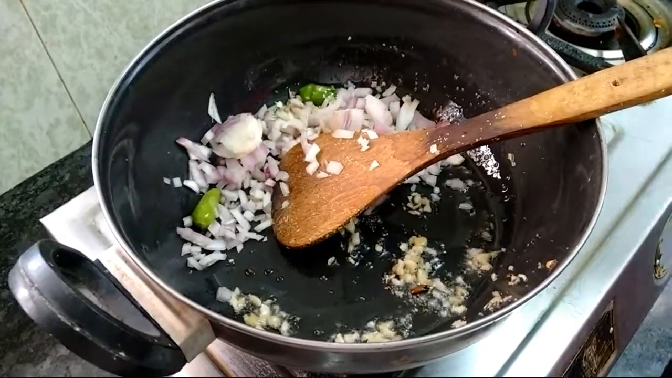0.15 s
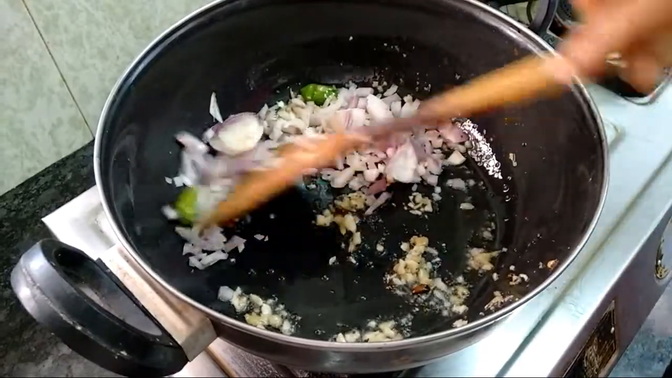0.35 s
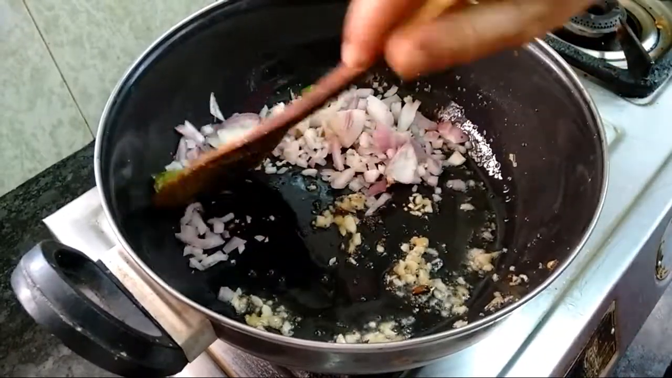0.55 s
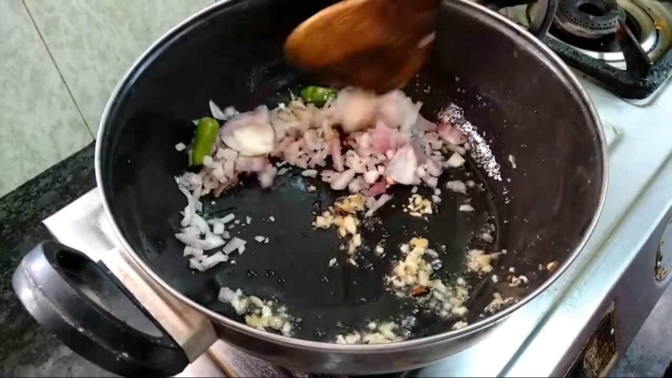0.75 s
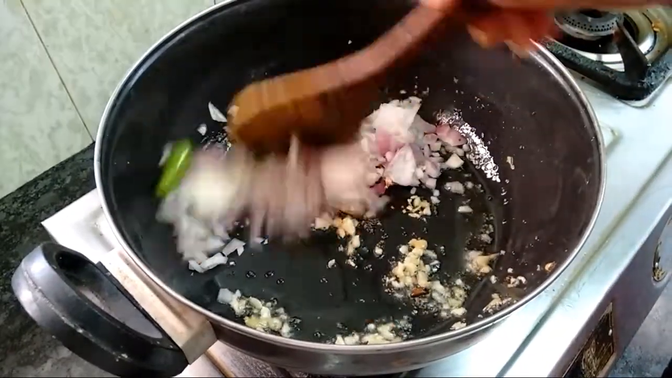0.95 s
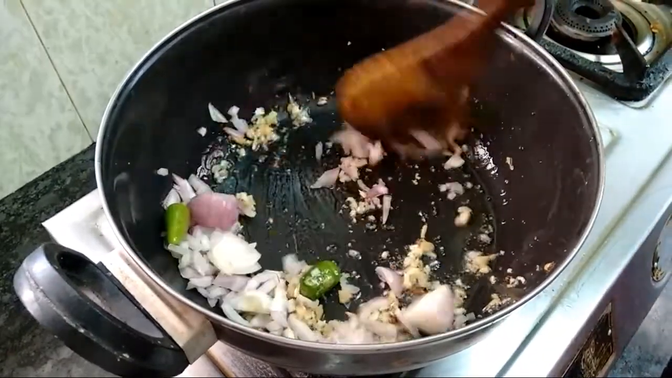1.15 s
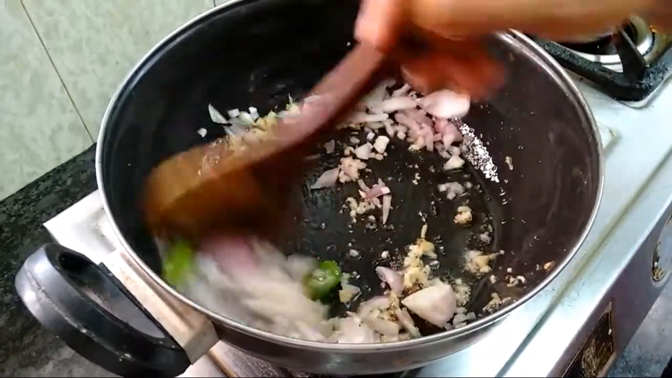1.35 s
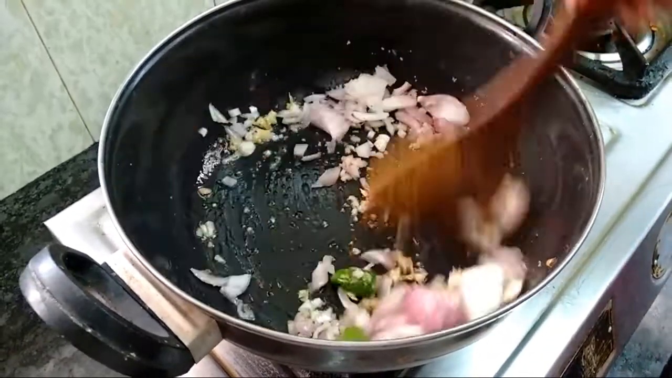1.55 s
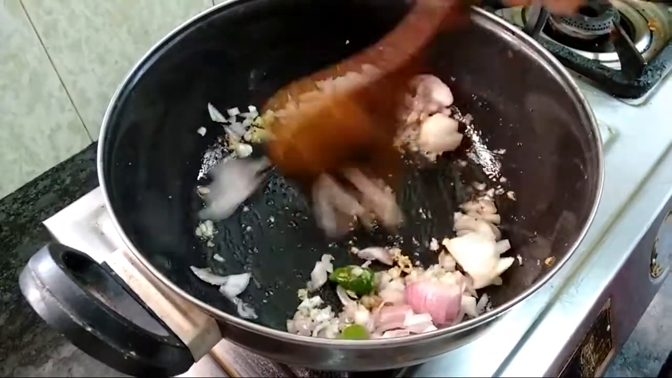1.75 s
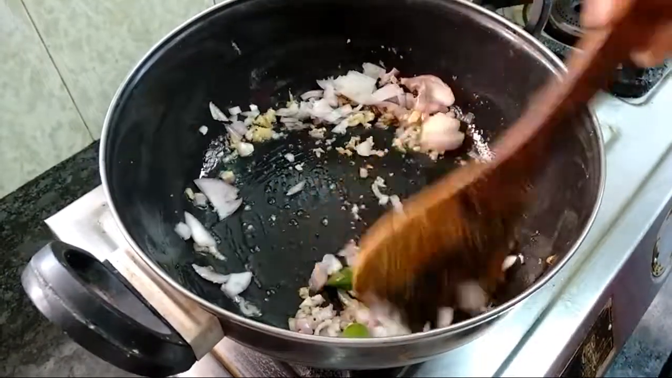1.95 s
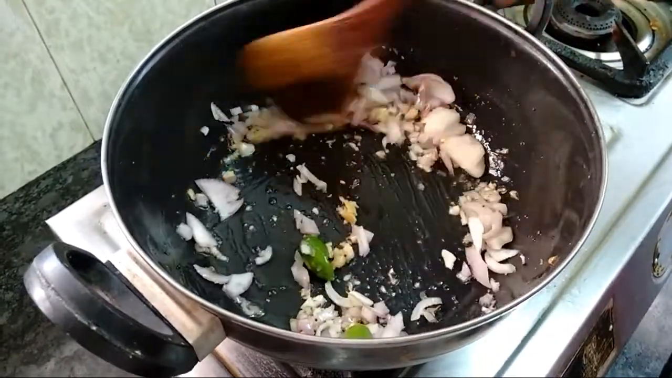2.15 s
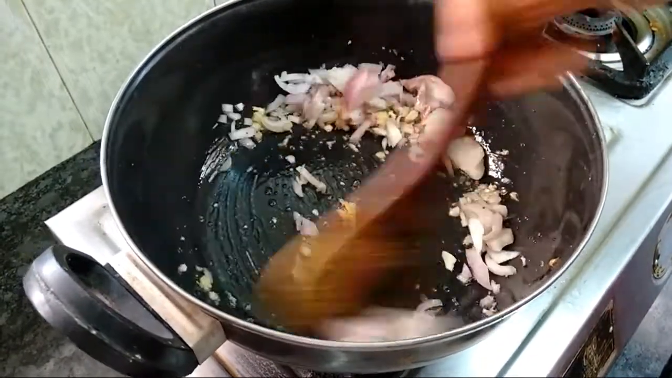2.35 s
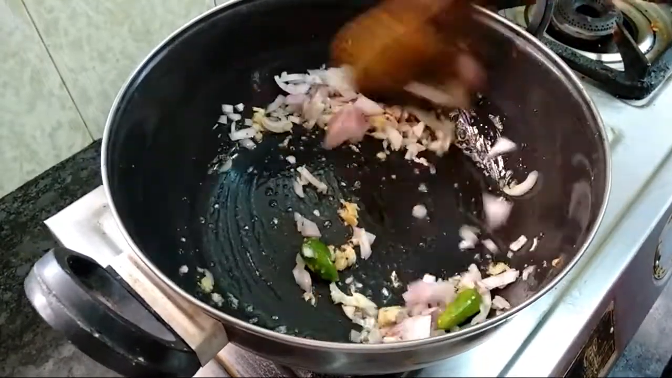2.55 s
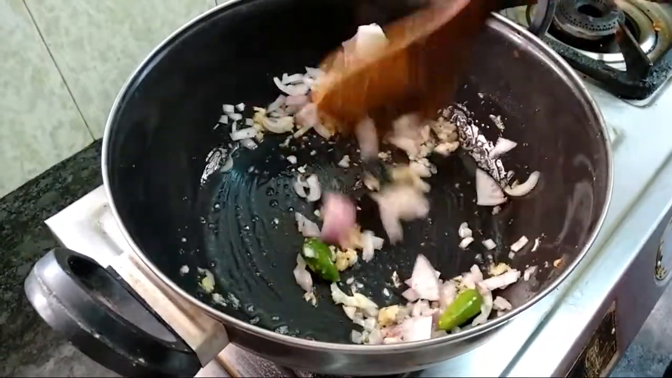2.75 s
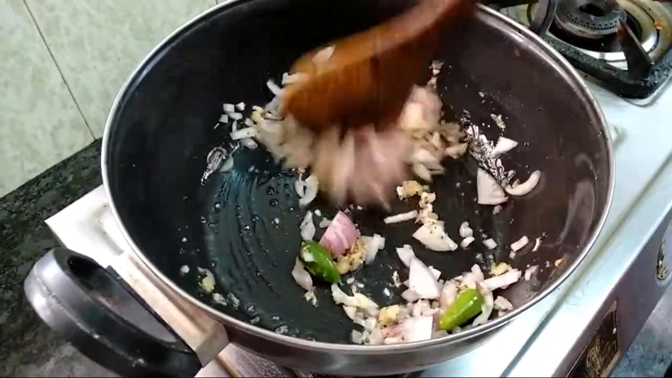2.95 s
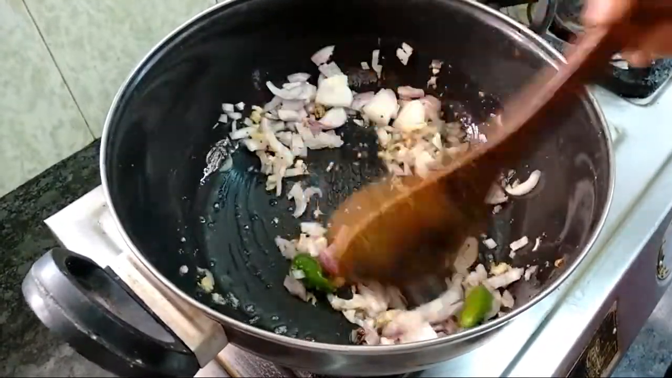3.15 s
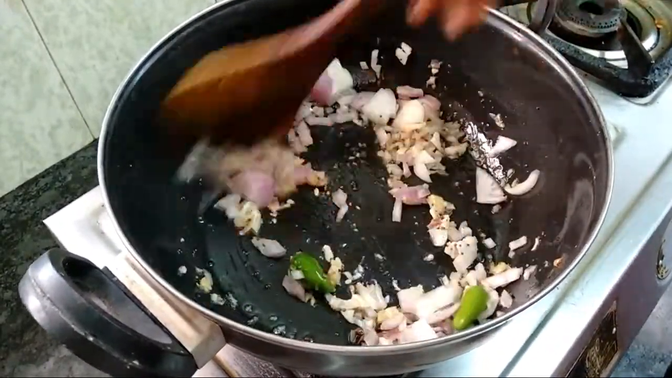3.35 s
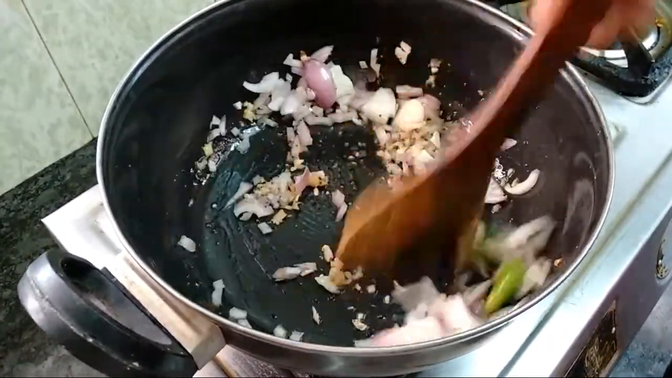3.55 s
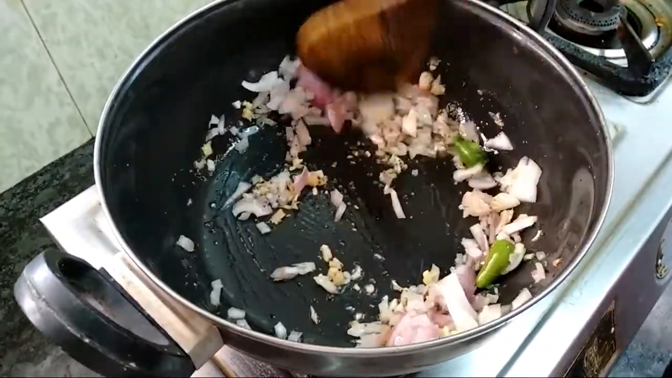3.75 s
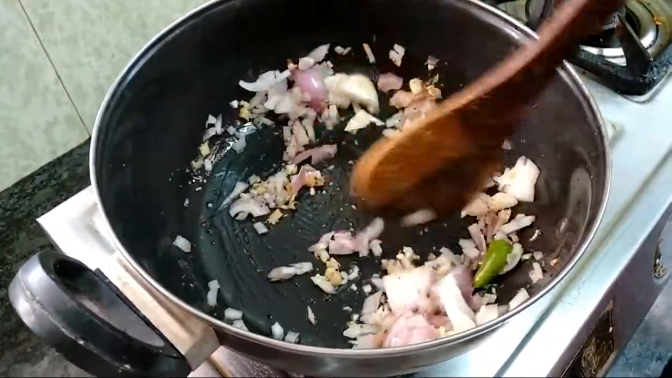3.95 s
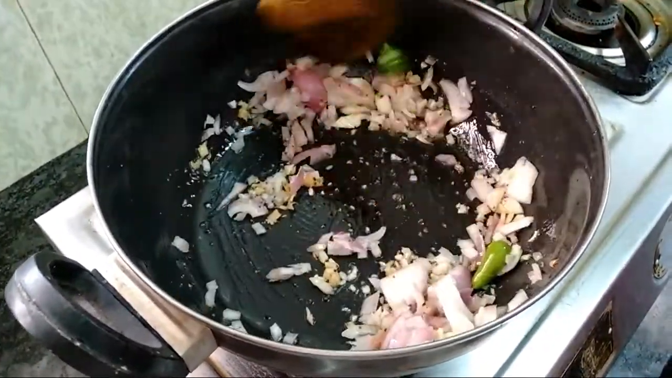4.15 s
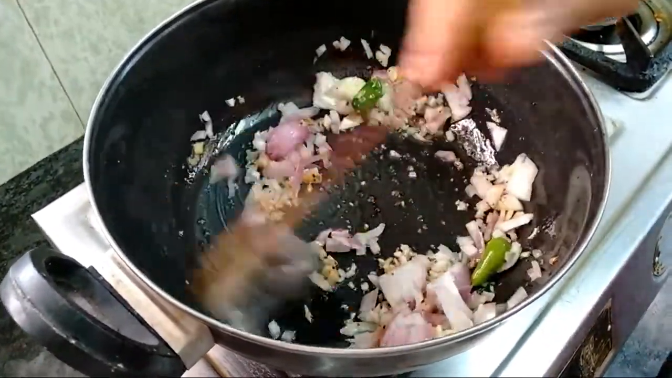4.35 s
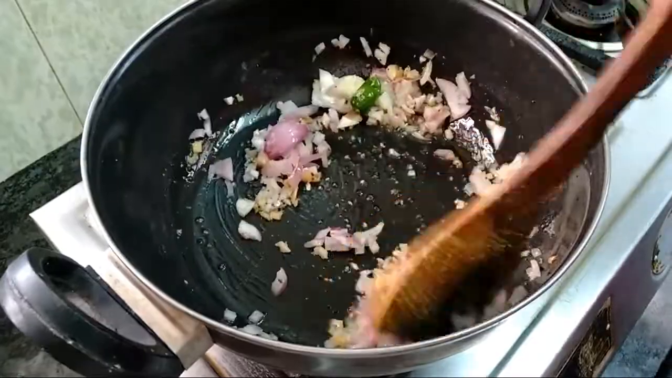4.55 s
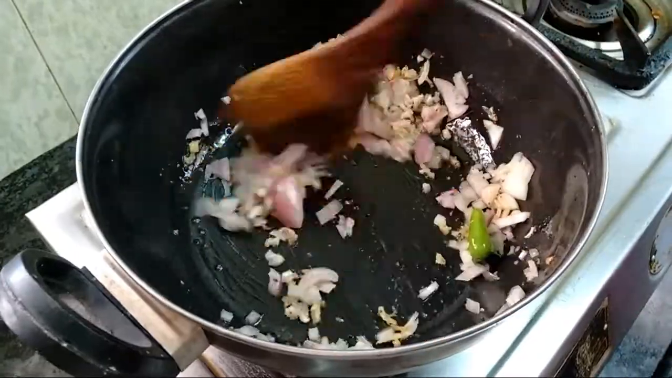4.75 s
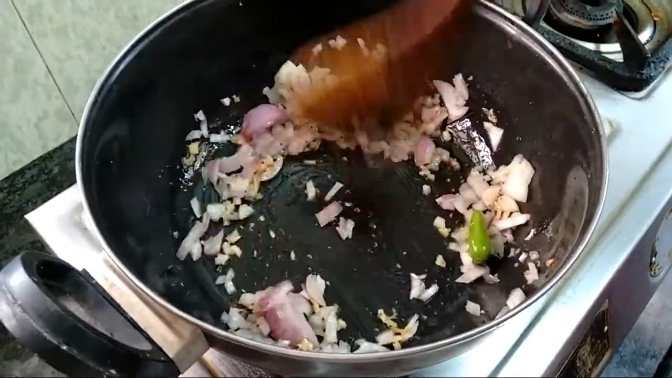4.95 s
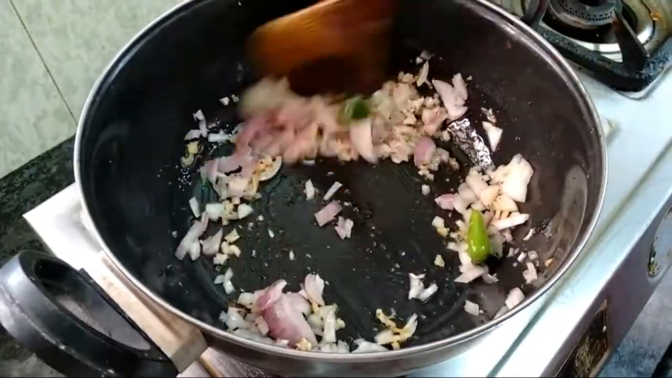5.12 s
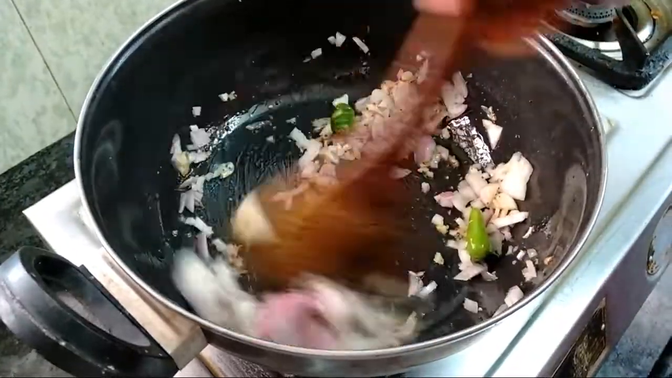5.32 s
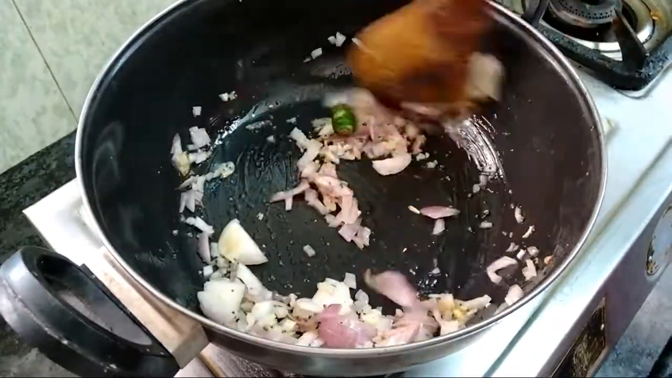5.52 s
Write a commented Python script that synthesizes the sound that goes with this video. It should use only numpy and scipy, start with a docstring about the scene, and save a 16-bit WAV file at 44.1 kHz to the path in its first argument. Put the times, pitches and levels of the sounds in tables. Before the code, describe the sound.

Soft frying alone at first, a tiny handle squeak, then busy irregular stirring until the end. Wood clacks against a metal pan with short, dull rings, rubbing over the oiled bottom and sometimes chattering. Bright sizzle swells after the strokes, dotted with crackles and snappy ticks. The microphone is close, the small room fairly dry, with a faint low stove rush.

```python
"""In a small kitchen, a wooden spatula stirs chopped onions in a pan of hot oil on a gas stove.
Steam bubbles are random clicks and noise, flaring where wet onion meets hot metal; larger ones pop or spit.
Friction is noise or stick-slip shaped by spectra and by the pan's modes; each knock is a clack with a modal ring.
Two ports close by hear direct and scattered sound, dense reverberation, and filtered noise for the low rush
of the burner with a fan hum near 100 Hz.
"""
import sys
import numpy as np
from scipy import signal
from scipy.fft import rfft, irfft
from scipy.io import wavfile
from scipy.ndimage import uniform_filter1d

SR = 44100
rng = np.random.default_rng(int(sys.argv[2]) if len(sys.argv) > 2 else 0)


def materialize(psi):
    """Save the field psi as 16-bit PCM at rate SR to the path in sys.argv[1].

    A 1-D psi becomes a single channel; in a 2-D psi each row is a channel.
    """
    bounded = np.clip(np.atleast_2d(psi).T, -1, 1)
    quanta = np.round(bounded * 32767).astype(np.int16)
    wavfile.write(sys.argv[1], SR, quanta)


N = 246078
TIME, BINS = np.arange(N) / SR, np.fft.rfftfreq(N, 1 / SR)  # [s], [Hz]

# Spectrum of the frying bubbles: (frequency [Hz], relative spectral density [dB])
SIZZLE_SPECTRUM = [(200, -35), (500, -6.5), (960, -14.5), (1200, -3.5), (1360, -14.5), (1580, -9),
                   (1900, -8), (2200, -9.5), (2420, -17), (2650, 0), (2900, -3), (3650, -3.5), (4300, -3),
                   (4900, -6), (6200, -1.46), (7400, 0), (8450, 1.5), (9500, -3), (11500, -10)]
# Wet onion pushed onto hot metal:
# (time [s], length [s], relative level [dB], body setting around 3.5 kHz [dB])
ONION_FLARES = [(0.332, 0.072, -38.5, -7.5), (0.603, 0.4, -44, -2), (0.963, 0.18, -26.5, -12),
                (1.382, 0.042, -32.5, -9), (1.604, 0.17, -33.5, -10.5), (1.773, 0.28, -33, -10.5),
                (2.034, 0.13, -26, -10.5), (2.287, 0.095, -37, -9.5), (2.465, 0.2, -40.5, -8),
                (2.725, 0.29, -32, -14), (2.97, 0.2, -29, -13.5), (3.212, 0.15, -27, -16.5),
                (3.418, 0.18, -32, -14), (3.641, 0.077, -30.5, -12), (3.86, 0.093, -30, -11.5),
                (4.046, 0.032, -31, -20), (4.272, 0.28, -30, -14.5), (4.659, 0.14, -28.5, -12.5),
                (5.093, 0.023, -33, -6.5), (5.176, 0.17, -29.5, -16), (5.42, 0.11, -33.5, -21)]
# Spectrum of the popping bubbles: (frequency [Hz], relative spectral weight [dB])
CRACKLE_SPECTRUM = [(500, -22), (2300, -21), (3600, -3), (5000, -5), (8400, 5), (15000, -3)]
# Spectrum of the burner's low rush with a 100 Hz fan hum: (frequency [Hz], relative spectral density [dB])
BURNER_AND_FAN_SPECTRUM = [(20, 1), (50, 0), (75, 4), (101, 17), (140, 4), (200, 0.5), (330, 15.5),
                           (600, -9), (1200, 8), (3000, -16)]
# The handle squeaks as it is taken up:
# (time [s], length [s], relative level [dB], pitch [Hz], glide [Hz/s])
HANDLE_SQUEAKS = [(0.232, 0.032, -43, 1615, 1000), (0.233, 0.026, -38, 2070, -2500),
                  (0.25, 0.042, -44, 2280, -3000), (0.292, 0.041, -45, 1670, 200),
                  (0.28, 0.03, -47, 2100, -500)]
# The blade is pushed over the oiled bottom: (time [s], length [s], relative level [dB])
BLADE_STROKES = [(0.34, 0.29, -47), (0.91, 0.26, -36.5), (1.128, 0.026, -40), (1.346, 0.16, -34.5),
                 (1.597, 0.031, -37), (1.765, 0.039, -40.5), (2, 0.31, -42.5), (2.354, 0.15, -41),
                 (2.77, 0.3, -42), (3.065, 0.078, -37), (3.23, 0.08, -40), (3.482, 0.13, -32.5),
                 (3.91, 0.14, -42.5), (4.11, 0.13, -40.5), (4.385, 0.13, -36), (4.728, 0.02, -38.5),
                 (5.13, 0.12, -38.5), (5.432, 0.034, -40.5)]
# Spectrum of the sliding blade: (frequency [Hz], relative spectral weight [dB])
SLIDE_SPECTRUM = [(60, -72), (150, -6.5), (255, 0), (310, 5), (420, 3), (600, 0.5), (900, -2.5),
                  (1500, -8.5), (2500, -36), (5000, -15)]
# Vibration modes of the pan: (nominal frequency [Hz], relative level [dB], decay time t60 [s])
PAN_MODES = [(250.4, -29.5, 0.49), (340, -25, 0.32), (373.3, -13, 0.21), (446.6, 0.5, 0.094),
             (474, -25, 0.15), (603, -22.5, 0.26), (662, -12, 0.2), (717, -14.5, 0.12), (782, -16.5, 0.08),
             (814, -26, 0.3), (864, -14, 0.22), (1090, -13.5, 0.08), (1270, -23, 0.13), (1294, -23, 0.051),
             (1485, -24.5, 0.11), (1706, -29, 0.15), (2920, -34, 0.08), (3420, -23, 0.05),
             (3670, -25, 0.04)]
# Share of a mode that lives in the wall of the pan: (frequency [Hz], share [0..1])
WALL_SHARE = [(480, 0.081), (620, 1), (800, 0.76), (1100, 0)]
# Single spits of oil and snaps of onion:
# (time [s], relative peak level [dB], body setting around 3.5 kHz [dB])
OIL_SPITS = [(0.353, -12, -29), (0.828, -6.5, -18), (1.182, -6.5, -19), (2.774, -9, -25), (2.851, -9, -22),
             (3.0067, -6, -16), (3.239, -8, -5), (3.378, -11, -22), (3.474, -10, -33), (3.619, -14, -26),
             (3.816, -4, -25), (4.025, -8, -41), (4.069, -9, -14), (4.229, -9.5, -15), (4.2844, -10, -21),
             (4.5862, -7.5, -28), (4.683, -1.5, -8), (4.797, -5.5, -31), (5.263, -4, -21)]
# The spatula strikes the pan:
# (time [s], relative peak level [dB], hardness setting [dB], extra ring of the wall [dB])
PAN_KNOCKS = [(0.36, -41, -26, -12), (0.405, -39.5, -23, -2), (0.709, -24, -9, -2), (0.878, -15, 3, -9),
              (1.043, -26, -1, 3), (1.078, -34, -19, -1), (1.102, -24, -15, -4), (1.272, -32, -21, -2),
              (1.3645, -15.5, 3.5, -2), (1.403, -22, 2, 3), (1.578, -12.5, 7.5, 5.5), (1.763, -33, -26, -4),
              (2.014, -17, 8, -10), (2.073, -28.5, -17, -2), (2.7464, -15.5, -11.5, 0.5),
              (3.0222, -4.5, -9, -4), (3.0415, -19, -3, 0), (3.406, -25, 4, -10), (3.505, -28.5, -4, -2),
              (3.612, -20.5, -8, -1), (3.874, -13, -7, 2.5), (4.0718, -13.5, -14, -4),
              (4.0865, -30, -12, 8), (4.115, -29.5, -15, 8), (4.326, -20, -0.5, 3), (4.383, -27, 4, 8),
              (4.682, -31, 20, 0), (4.709, -20.5, -11, -2), (4.918, -40.5, -18, 1), (5.1167, -16.5, 0, 2),
              (5.182, -26, -10, -0.5), (5.334, -33, -11, 7), (5.467, -31, 11, 6)]
# Spectrum of the wooden blade's clack: (frequency [Hz], relative spectral weight [dB])
WOOD_SPECTRUM = [(60, -39), (150, -2), (300, 7.5), (520, 15.5), (1200, 8.5), (1800, 2.5), (2400, 7.5),
                 (3500, -5.5), (5000, -32.5), (9000, -13)]
# Spectrum of the juddering blade: (frequency [Hz], relative spectral density [dB])
JUDDER_SPECTRUM = [(50, -56), (100, -11), (190, -14), (245, 1), (290, -7), (375, 1), (445, -2), (560, -8),
                   (690, -4), (900, -12.5), (1080, -10), (1500, -16.5), (2100, -24), (4000, -37)]
# The blade catches and chatters in step with a resonance of the pan:
# (time [s], length [s], relative level [dB], mean slip rate [1/s])
BLADE_CHATTERS = [(0.635, 0.012, -34, 340), (0.704, 0.059, -30, 368), (0.71, 0.058, -36, 250),
                  (1.1, 0.026, -41, 426), (3.228, 0.064, -44, 250), (3.278, 0.077, -47.5, 410),
                  (3.532, 0.061, -36, 350), (4.734, 0.03, -33.5, 490), (4.805, 0.039, -42, 450),
                  (5.185, 0.036, -41, 750)]
# The edge of the blade meets bare metal:
# (time [s], relative level [dB], centre frequency [Hz], width [octaves], decay time t60 [s])
METAL_PINGS = [(0.881, -34.5, 3100, 0.1, 0.15), (1.579, -48, 3000, 0.29, 0.1),
               (3.022, -30, 3340, 0.28, 0.11)]
# The stove thuds under a push:
# (time [s], relative level [dB], centre frequency [Hz], width [octaves], decay time t60 [s])
STOVE_THUDS = [(4.327, -44, 125, 0.77, 0.39), (5.12, -39.5, 255, 0.25, 0.27),
               (5.241, -47.5, 118, 0.45, 0.29)]
# Reverberation of the kitchen: (frequency [Hz], decay time t60 [s])
KITCHEN_DECAY = [(150, 0.23), (500, 0.36), (1400, 0.13), (8000, 0.23)]
# Share of the power that reaches both ports alike: (frequency [Hz], share [0..1])
DIRECT_SHARE = [(100, 0.97), (400, 0.89), (1150, 1), (1900, 1), (2650, 1), (3050, 0.91), (3700, 1),
                (4800, 0.38), (6200, 0.69), (8500, 0.65), (10500, 0.042), (15000, 0.98)]
# Colour difference of the ports: (frequency [Hz], left minus right [dB])
PORT_BALANCE = [(100, 7), (190, -2.5), (300, 1), (440, 6.5), (620, 1.5), (1000, 1.2), (1550, -2), (2200, 0),
                (3000, -1), (3700, -0.5), (6500, 0.5), (8300, -0.5), (9800, -7), (15000, -3.5)]


def gain_of(db):
    """Level relation: decibels become an amplitude ratio."""
    return 10 ** (np.asarray(db) / 20)


def evened(x):
    """Normalisation: a signal divided by its root mean square has rms 1."""
    return x / np.sqrt(np.mean(x ** 2) + 1e-20)


def read(points, hz):
    """Interpolation: a spectral table is read linearly on a log-frequency axis."""
    f, value = np.transpose(points)
    return np.interp(np.log(hz + 1), np.log(f + 1), value)


def add(mix, s, sound):
    """Superposition: a sound is added to the mix from s seconds on."""
    part = mix[max(round(s * SR), 0):][:len(sound)]
    part += sound[:len(part)]


def colour(x, points, size=4096):
    """Minimum-phase filtering: the log gain and its Hilbert transform give a causal response."""
    log_gain = np.log(gain_of(read(points, abs(np.fft.fftfreq(size, 1 / SR)))))
    response = np.exp(np.conj(signal.hilbert(log_gain)))
    taps = np.fft.ifft(response).real[:size // 2]
    return signal.oaconvolve(x, taps)[:len(x)]


def clicks(per_s, spread_db, cap):
    """Shot noise: impulses of random sign at random times, their dB offsets capped exponential draws."""
    size = gain_of(spread_db * np.minimum(rng.exponential(1, N), cap))
    return evened(size * rng.choice([-1, 1], N) * (rng.random(N) < per_s / SR))


def wander(rate_hz):
    """Band-limited noise: low-pass filtering leaves a random drift of rms 1."""
    lowpass = signal.butter(2, rate_hz, fs=SR, output="sos")
    return evened(signal.sosfilt(lowpass, rng.standard_normal(N)))


def gesture(start, length, rise_s, t60):
    """Exponential relaxation: a force builds up, holds for the length, then decays."""
    t = np.maximum(TIME - start, 0)
    return (1 - np.exp(-t / rise_s)) * np.exp(-np.log(1000) * np.maximum(t - length, 0) / t60)


def frying(resting_db=-40, stirred_db=-35, stirred_by_s=0.5, simmer_body_db=-12):
    """Power addition: flares from boiling water add to a simmer that grows as stirring spreads the onions."""
    power = gain_of(np.interp(TIME, [0, stirred_by_s], [resting_db, stirred_db])) ** 2
    body = power * gain_of(simmer_body_db) ** 2
    for s, length, db, body_db in ONION_FLARES:
        # steam builds up quickly, then the water boils off
        flare = (gain_of(db) * gesture(s, length, rise_s=0.016, t60=0.46)) ** 2
        power = power + flare
        body = body + flare * gain_of(body_db) ** 2
    return 10 * np.log10(power), 10 * np.log10(body / power)


def sizzle(bubbles_per_s=3000, fizz_db=-7, flurry_db=0.5, usual_body_db=-10.5, level_db=-0.27):
    """Shot noise of bursting bubbles over a fine fizz: flares move its level and its spectral balance."""
    frying_db, body_db = frying()
    bursts = clicks(bubbles_per_s, spread_db=-1.0, cap=6.8) + gain_of(fizz_db) * rng.standard_normal(N)
    sound = evened(colour(bursts * gain_of(flurry_db * wander(rate_hz=18)), SIZZLE_SPECTRUM))
    body_band = [(900, 0.94), (2500, 1.0), (4200, 1), (6500, 0.23)]  # (frequency [Hz], gain)
    body = irfft(rfft(sound) * read(body_band, BINS), N)
    balanced = sound + (gain_of(body_db - usual_body_db) - 1) * body
    return gain_of(frying_db + level_db) * balanced


def crackle(count=900, spread_db=3.0, cap=3.9, level_db=-43):
    """Bubble resonance: each larger bubble is a damped sine rising as it closes, louder during flares."""
    lowest_hz, highest_hz = 3000, 12200
    cycles, glide = 1.6, 0.087  # cycles until a pop has faded to 1/e, phase advance that raises the pitch
    pops = np.zeros(N)
    for when, pitch, chance in rng.random((count, 3)):
        hz = lowest_hz * (highest_hz / lowest_hz) ** pitch
        age = np.arange(256) / SR * hz / cycles
        turns = cycles * age * (1 + glide * (1 - np.exp(-age)))
        pop = np.exp(-age) * np.sin(2 * np.pi * turns)
        add(pops, when * N / SR, gain_of(spread_db * min(-np.log(1 - chance), cap)) * pop)
    return gain_of(level_db) * evened(colour(pops, CRACKLE_SPECTRUM) * gain_of(frying()[0]))


def burner_and_fan(level_db=-58):
    """Filtered stationary noise: one spectrum holds the burner's low rush and a fan hum near 100 Hz."""
    return gain_of(level_db) * evened(colour(rng.standard_normal(N), BURNER_AND_FAN_SPECTRUM))


def squeaking(jitter=0.018, rough=0.44):
    """Stick-slip oscillation: thin, scratchy tones glide as the grip on the handle tightens."""
    pace, out = 1 + jitter * wander(rate_hz=140), np.zeros(N)
    for s, length, db, hz, glide in HANDLE_SQUEAKS:
        pitch = hz + glide * np.clip(TIME - s, 0, length)
        tone = np.sin(2 * np.pi * np.cumsum(pitch * pace) / SR)
        out += gain_of(db) * gesture(s, length, rise_s=0.006, t60=0.081) * tone
    return out * evened(1 + rough * wander(rate_hz=200))


def pan_ring(t, hardness_db, wall_db, uneven_db=2.0, detune=0.0049, soft_hz=500, hard_hz=1200):
    """Modal superposition: hard blows wake upper modes, blows near the wall middle ones; the blade shifts them."""
    hz, db, t60 = np.transpose(PAN_MODES)[:, :, None]
    # the strongest mode keeps its nominal weight and frequency
    weight, shift = rng.standard_normal((2, len(PAN_MODES), 1)) * (db < db.max())
    hardness = hardness_db * read([(soft_hz, 0), (hard_hz, 1)], hz)
    db = db + hardness + wall_db * read(WALL_SHARE, hz) + uneven_db * weight
    modes = gain_of(db - 60 * t / t60) * np.cos(2 * np.pi * hz * (1 + detune * shift) * t)
    return modes[1::2].sum(0) - modes[::2].sum(0)  # neighbouring modes swing in opposite directions


def pushing(sag_db_per_s=29):
    """Power addition of strokes: the blade bites, weakens as it slows down, and lifts."""
    power = 0
    for s, length, db in BLADE_STROKES:
        sagging_db = db - sag_db_per_s * np.maximum(TIME - s, 0)
        power = power + (gain_of(sagging_db) * gesture(s, length, rise_s=0.015, t60=0.85)) ** 2
    return np.sqrt(power)


def sliding(slips_per_s=1300, ring_db=-9, lumps_db=1.0, level_db=-2.0):
    """Dry friction as shot noise: small slips of wood on metal, uneven where onion rolls under the blade."""
    slips = clicks(slips_per_s, spread_db=3.5, cap=4.8) * gain_of(lumps_db * wander(rate_hz=16.0))
    ring = signal.oaconvolve(slips, pan_ring(np.arange(SR // 2) / SR, 0, 0))[:N]
    rub = evened(colour(slips, SLIDE_SPECTRUM)) + gain_of(ring_db) * evened(colour(ring, SLIDE_SPECTRUM))
    return gain_of(level_db) * pushing() * evened(rub)


def spits(swell_s=0.00082, usual_body_db=-8, level_db=-11.0):
    """Impulsive radiation: a larger droplet bursts as a short noise pulse, one sharp tick."""
    out, t = np.zeros(N), np.arange(512) / SR
    burst = (t / swell_s) ** 2 * np.exp(-2 * t / swell_s)
    for s, db, body_db in OIL_SPITS:
        body = body_db - usual_body_db
        spectrum = [(1200, body - 20), (3700, body - 3), (8500, -8), (15000, -37.0)]  # (Hz, dB)
        tick = colour(rng.standard_normal(len(t)) * burst, spectrum)
        add(out, s, gain_of(db + level_db) * tick / abs(tick).max())
    return out


def rebounds(bounce_db=-21, earliest_s=0.007, latest_s=0.025, count=2):
    """Elastic rebound: after the first contact the springy blade touches again more lightly."""
    touches = np.zeros(SR // 10)
    touches[0] = 1
    touches[(SR * rng.uniform(earliest_s, latest_s, count)).astype(int)] = gain_of(bounce_db)
    return touches


def knocks(usual_hardness_db=-10, clack_db=1, rattle_db=1, rattle_t60=0.2, crispness=0.038,
           ring_hardness=0.37, radiates_hz=200, dull_hz=1900, squeeze_s=0.001582, level_db=1):
    """Impact excitation: after squeezing through onion, the blade clacks and sets the loaded pan ringing."""
    out, t = np.zeros(N), np.arange(SR // 2) / SR
    radiation = signal.butter(2, [radiates_hz, dull_hz], "bandpass", fs=SR, output="sos")
    for s, db, hardness_db, wall_db in PAN_KNOCKS:
        extra_db = hardness_db - usual_hardness_db
        rattle = rng.standard_normal(len(t)) * np.exp(-np.log(1000) * t / rattle_t60)
        # bare metal gives a cleaner tick
        rattle *= gain_of(rattle_db - crispness * extra_db) / np.linalg.norm(rattle)
        clack = colour((t == 0) + rattle, WOOD_SPECTRUM)
        ring = signal.sosfilt(radiation, pan_ring(t, ring_hardness * extra_db, wall_db))
        contact = ring + gain_of(clack_db + extra_db) * clack / abs(clack).max()
        blow = signal.oaconvolve(contact, rebounds())
        add(out, s + squeeze_s, gain_of(db + level_db) * blow / abs(blow).max())
    return out


def juddering(slips_per_s=170, jitter=0.63, grit_db=0):
    """Irregular stick-slip: the blade judders along the dry wall, with grit noise between uneven slips."""
    start_s, peak_s, end_s = 0.594, 0.73, 0.855  # pressed hardest at the peak of its sweep
    peak_db, swell_db_per_s, ease_db_per_s = -31, 46, 96
    pace = slips_per_s * np.exp(jitter * evened(uniform_filter1d(rng.standard_normal(N), size=300)))
    slips = np.diff(np.floor(np.cumsum(pace) / SR), prepend=0)
    grit = gain_of(grit_db) * rng.standard_normal(N)
    rub = evened(colour(evened(slips - slips.mean()) + grit, JUDDER_SPECTRUM))
    touching = uniform_filter1d(1. * ((TIME > start_s) & (TIME < end_s)), size=600)
    eased_db = np.maximum(swell_db_per_s * (peak_s - TIME), ease_db_per_s * (TIME - peak_s))
    return gain_of(peak_db - eased_db) * touching * rub


def chattering(jitter=0.08, rough=0.16, overtone_db=-18):
    """Mode-locked stick-slip: slips in step with the pan form a short, rough harmonic groan."""
    pace = np.cumsum(1 + jitter * wander(rate_hz=135.0)) / SR
    grip = 1 + rough * wander(rate_hz=55)
    out = np.zeros(N)
    for s, length, db, hz in BLADE_CHATTERS:
        slips = sum(gain_of(overtone_db * k) * np.sin(2 * np.pi * (k + 1) * hz * pace) for k in range(3))
        out += gain_of(db) * gesture(s, length, rise_s=0.019, t60=0.094) * evened(grip * slips)
    return out


def puffs(events, rise_s=0.0021):
    """Damped narrow-band noise: each event is a short dying puff of sound around one pitch."""
    out = np.zeros(N)
    for s, db, hz, octaves, t60 in events:
        band = np.exp(-.5 * (np.log2((BINS + 1) / hz) / octaves) ** 2)
        puff = evened(irfft(rfft(rng.standard_normal(N)) * band, N))
        fade = (1 - np.exp(-TIME / rise_s)) * np.exp(-np.log(1000) * TIME / t60)
        add(out, s, gain_of(db) * puff * fade)
    return out


def pings():
    """Damped resonance: bare metal pings under the edge of the blade as high bands of noise die away."""
    return puffs(METAL_PINGS)


def thuds():
    """Damped resonance: the pushed stove thuds as low bands of noise die away."""
    return puffs(STOVE_THUDS)


def tails(t60_points, size=SR // 2):
    """Diffuse reverberation: dense reflections differ at each port, and each band decays at its own rate."""
    taps = rng.choice([-1., 1.], (2, size)) * (rng.random((2, size)) < .2)
    hz, t, z = signal.stft(taps, SR, nperseg=256)
    decay = gain_of(-60 * t / read(t60_points, hz)[:, None])
    tail = signal.istft(z * decay, SR, nperseg=256)[1]
    return tail / np.linalg.norm(tail, axis=1, keepdims=True)


def scattered(x, size=256):
    """Multipath scattering: many short paths give every moment and band a random phase."""
    z = signal.stft(x, nperseg=size)[2]
    turned = z * np.exp(2j * np.pi * rng.random(z.shape))
    return x.std() * evened(signal.istft(turned, nperseg=size)[1][:N])


def ports(x, side, scatter=1., alike_below_hz=1150, half_turn_hz=1235):
    """Phase difference: sound from one side meets the ports out of step, with scatter off the pan wall."""
    # the phase difference grows by half a turn per half_turn_hz
    turn = side * np.pi * np.maximum(BINS - alike_below_hz, 0) / half_turn_hz
    diffuse = np.clip(scatter * (1 - read(DIRECT_SHARE, BINS)), 0, 1)
    direct = rfft(x) * np.exp(.5j * np.array([turn, -turn]))
    stray = rfft(np.array([scattered(x), scattered(x)]))
    return irfft(np.sqrt(1 - diffuse) * direct + np.sqrt(diffuse) * stray, N)


def scene(left_share=0.56, room_db=-9.5):
    """Superposition: oil fries on both sides of the pan and the kitchen answers the spatula and the thuds."""
    blows = knocks()
    rubs = sliding() + juddering() + chattering() + squeaking() + pings() + thuds()
    left = ports(np.sqrt(left_share) * sizzle() + rubs + burner_and_fan(), side=1)
    right = ports(np.sqrt(1 - left_share) * sizzle(), side=-1.015)
    sharp = ports(blows + spits() + crackle(), side=1.0, scatter=0)
    room = signal.fftconvolve((blows + rubs)[None], tails(KITCHEN_DECAY), axes=1)[:, :N]
    return left + right + sharp + gain_of(room_db) * room


def record(dry, edge_hz=15600):
    """Linear filtering: each port has its own colour, then a low-pass limits the band."""
    lean = gain_of(np.outer([.5, -.5], read(PORT_BALANCE, BINS)))
    heard = irfft(rfft(dry) * lean / np.sqrt((lean ** 2).mean(0)), N)
    lowpass = signal.firwin(511, edge_hz, window=("kaiser", 9), fs=SR)
    return signal.oaconvolve(heard, lowpass[None], "same")


dry = scene()
out = record(dry)
materialize(out)
```